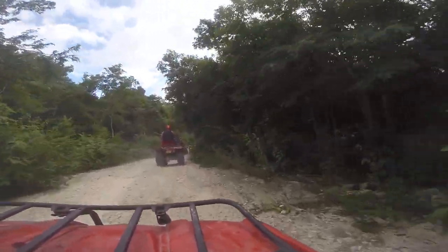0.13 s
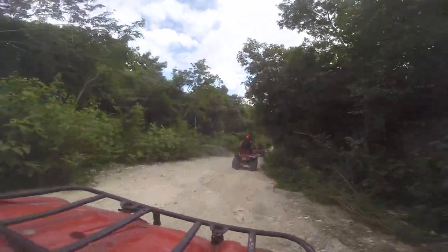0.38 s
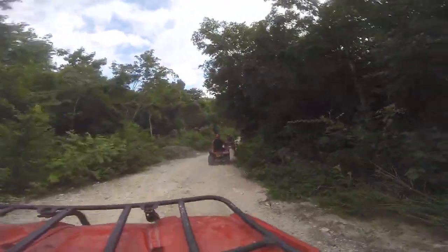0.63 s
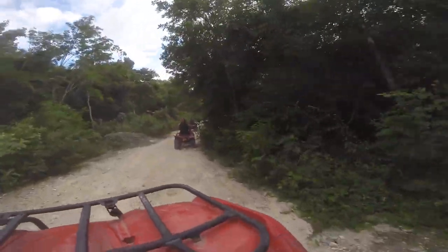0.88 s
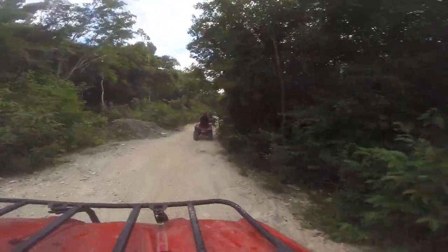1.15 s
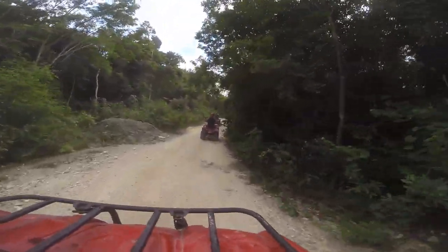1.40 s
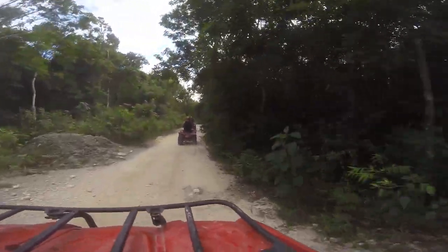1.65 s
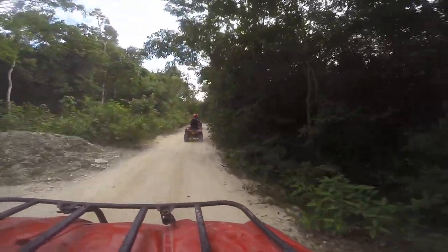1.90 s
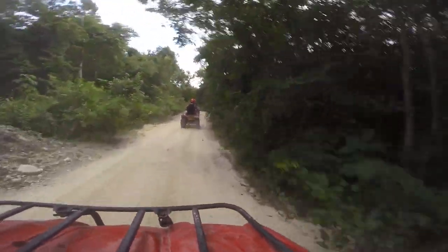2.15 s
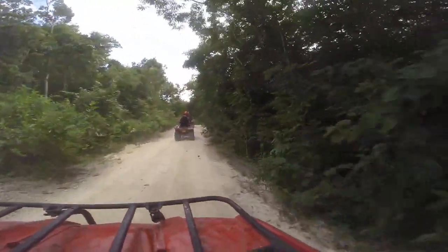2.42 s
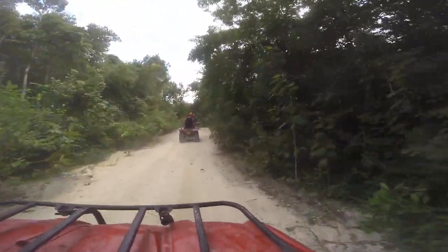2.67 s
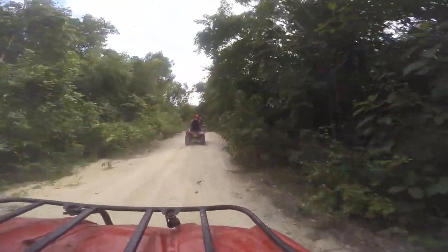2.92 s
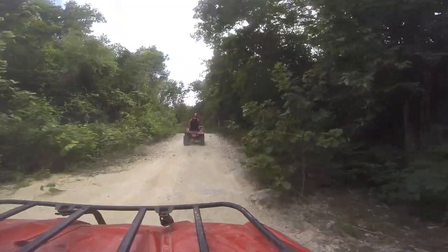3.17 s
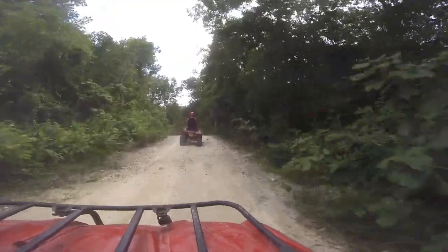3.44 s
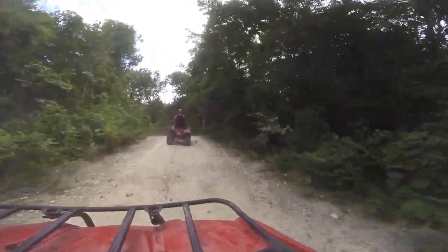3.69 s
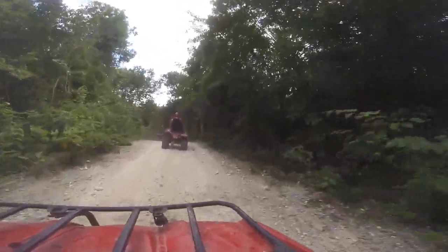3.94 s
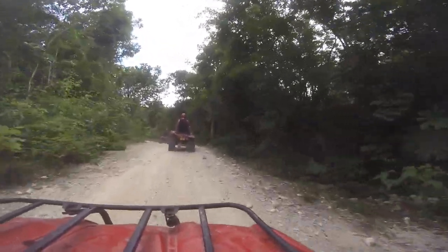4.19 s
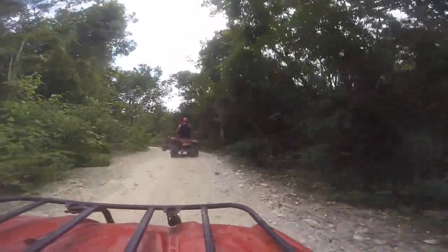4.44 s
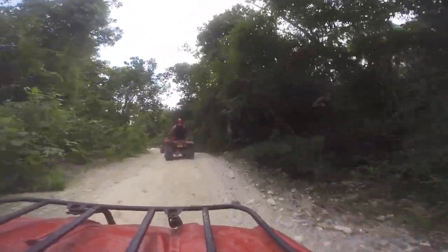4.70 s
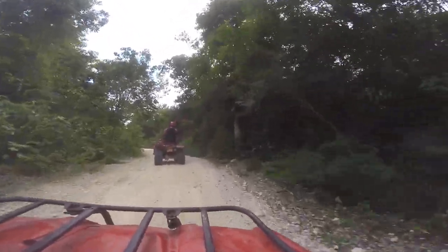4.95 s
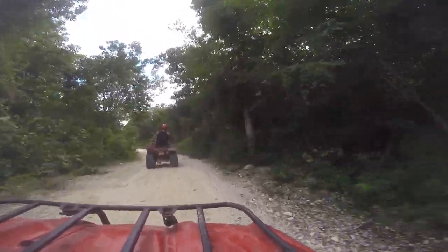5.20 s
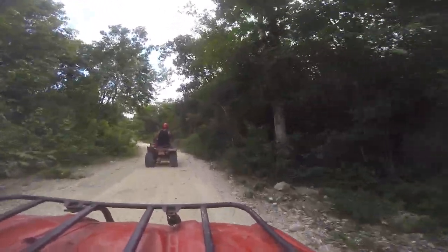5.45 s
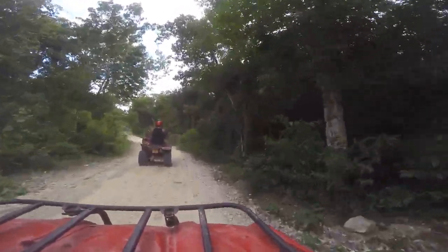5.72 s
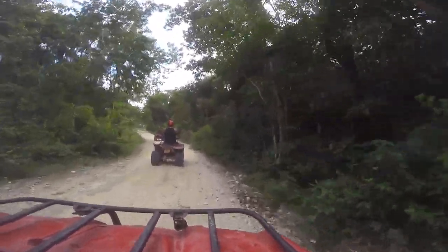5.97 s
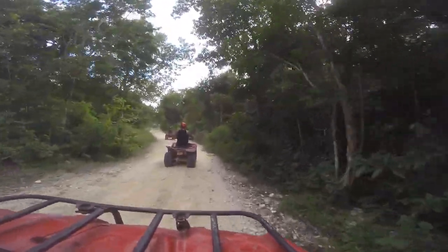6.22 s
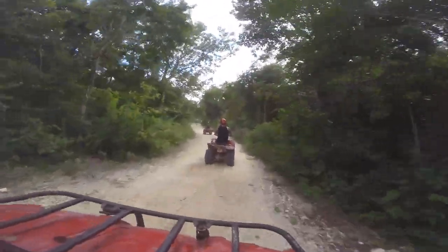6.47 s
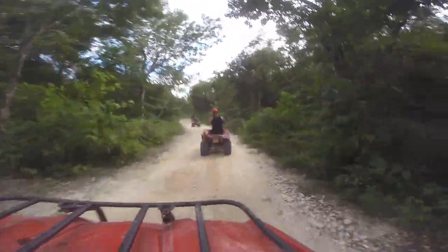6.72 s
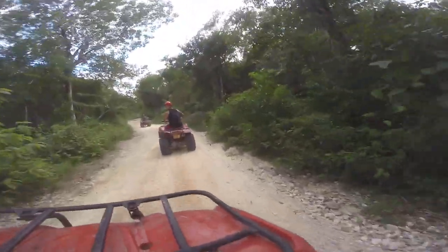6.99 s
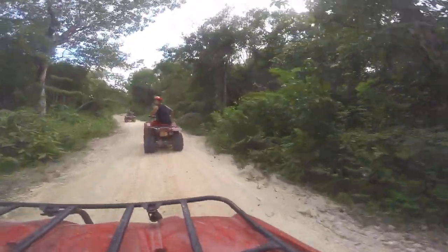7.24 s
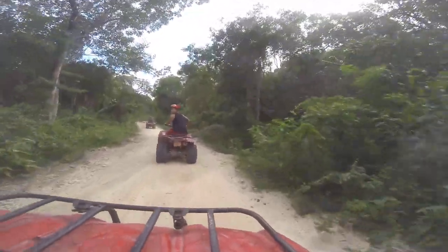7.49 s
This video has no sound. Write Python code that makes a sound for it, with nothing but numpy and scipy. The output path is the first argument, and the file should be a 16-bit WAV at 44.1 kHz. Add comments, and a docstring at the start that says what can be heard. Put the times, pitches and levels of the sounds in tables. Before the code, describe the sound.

From 0 to about 7.6 seconds, a quad bike bounces along a gravel track without stopping. A small sealed camera mounted on it hears everything close, boxy and dulled. A low, lumpy engine rumble, fluttering unevenly at nearly forty beats per second, lies under dense scratchy rattling and dull mount thuds. In the first 3 seconds hard plastic knocks come often, strong near 0.8, 1.3 and 2.2, with deep lurches and faint bright ticks. Short squeaks chirp around 2.3-2.4 and 2.9. The rattling swells near 3, eases around 4, with a slightly brighter rattle and a tiny squeak at 4.2. Thin panels sing faintly, mostly from 2.4 to 4.2. Knocks are sparser from 3 to 6.5, with rumble surging at 5.4. Jolts build again near 6.8; the loudest clacks and thump hit at 7.2, before the ride eases. Big swings briefly duck the level throughout.

```python
"""A low, lumpy rumble runs throughout under a dense rattle: a small sealed camera rides a quad bike on gravel.
Uneven firing and bumps excite the frame's resonances; random blows excite the mount, which thuds dully.
Scratches of loose contacts ring the plastic housing around the microphone, with sharp knocks, bright
ticks and short squeaks. Hard lurches are single low swings, and a gain control ducks after big swings."""
import sys
import numpy as np
from scipy import signal
from scipy.io import wavfile
from scipy.ndimage import uniform_filter1d

SR = 44100
rng = np.random.default_rng(int(sys.argv[2]) if len(sys.argv) > 2 else 0)


def generate_wav(sig):
    """Save sig (samples, or channels by samples) to the path in sys.argv[1] as 16-bit PCM at SR."""
    pcm = np.round(np.clip(np.atleast_2d(sig).T, -1, 1) * 32767).astype(np.int16)
    wavfile.write(sys.argv[1], SR, pcm)


def attenuation_scalar(level_db):
    """Turn a level in dB into a linear amplitude multiplier (20 dB per decade)."""
    decades = np.asarray(level_db, float) / 20
    return 10 ** decades


N = 336042

# Levels are those ahead of the gain control.
# roughness of the ride: start_s, rumble_db, thud_db, rattle_db
RIDE_ROUGHNESS = [(0, -9, -22.5, -22), (.25, -21.5, -24.5, -28.5), (.44, -14.5, -19, -22.5),
                  (.55, -14, -23.5, -27), (.8, -13.5, -17.5, -20), (1.05, -16, -24, -30),
                  (1.2, -26.5, -27, -34.5), (1.3, -12.5, -19.5, -25.5), (1.88, -15.5, -19.5, -20.5),
                  (2.3, -12.5, -21, -24.5), (2.45, -16, -20, -23), (2.72, -19, -22.5, -27.5),
                  (2.95, -12.5, -13.5, -19), (3.7, -16, -18.5, -25), (4, -19, -26, -31),
                  (4.2, -24, -18, -22.5), (4.25, -19, -24.5, -27.5), (4.35, -19.5, -22, -27.5),
                  (4.77, -16.5, -18.5, -24), (4.83, -14.5, -28, -32), (5.05, -17.5, -21.5, -28.5),
                  (5.3, -19.5, -23, -33), (5.44, -10, -18.5, -22.5), (5.7, -17, -22, -30),
                  (6.3, -16.5, -18.5, -27.5), (6.631, -16.5, -24, -28.5), (6.7, -20.5, -22, -24.5),
                  (6.81, -11, -21.5, -21), (6.98, -16, -22.5, -33.5), (7.15, -5.5, -15.5, -19.5),
                  (7.6, -21, -21, -30)]
# resonances of the frame: pitch_hz, width_hz, level_db
FRAME_MODES = [(35.7, 40, -1.5), (66.9, 48.5, -0.5), (106.6, 58.3, -4.5)]
# resonances of the mount: pitch_hz, width_hz, level_db
MOUNT_MODES = [(201.7, 133, -6), (276.4, 83, 2), (317.2, 77.4, -1), (513, 380, -20)]
# peaks and dips of the housing: pitch_hz, width_hz, level_db
HOUSING_MODES = [(1050, 630, 1), (1850, 235, 7), (1990, 990, -7), (2600, 110, 4), (3207, 163, -19),
                 (3870, 276, 10), (4022, 1170, -33.5), (4520, 110, 10.5), (6110, 300, 5), (7200, 560, -2),
                 (8650, 210, 8.5), (12600, 710, -4.5)]
# loose parts: pitch_hz, width_hz, level_db, touch_spread_db, buzz_share (buzz between touches, as a ratio)
LOOSE_PARTS = [(700, 800, -4, 3, 1.07), (1132, 610, 1.5, 4.5, 1.53), (1900, 680, -1, 5, 1.3),
               (2900, 2530, 1, 7, 0.41), (4110, 380, -6, 11.5, 0.26), (5840, 1500, -11.5, 11, 0.34),
               (6980, 1120, 0, 10, 1.1), (10970, 1460, 3.5, 8, 2.5)]
# gain of the rattle's treble: start_s, level_db
RATTLE_TREBLE = [(0, -2), (.8, 0), (3.9, -0.5), (4.18, 4), (4.4, -2.5), (5.201, -2.5), (6.499, -2),
                 (6.751, 1), (7.0, 0), (7.6, -5.5)]
# thin panels that sing: pitch_hz, width_hz, level_db, flutter_db
SINGING_PANELS = [(4550, 120, -31, 7.5), (8430, 130, -52.5, 11)]
# how freely the panels sing, only the changes count: start_s, level_db
PANEL_FREEDOM = [(0, 1), (2.002, -1.5), (2.401, 7.5), (3.801, 10), (4.2, 5.5), (4.349, -6.5), (7.602, -8)]
# hard knocks of the housing: start_s, peak_db, thud_db, pitch_hz
HARD_KNOCKS = [(0.046, -12.5, -20, 1410), (0.123, -5, -30, 1950), (0.292, -11, -29, 1270),
               (0.397, -8.5, -21, 1660), (0.617, -8, -7, 1030), (0.754, -1.5, -30, 1860),
               (0.781, -3.5, -16, 2200), (0.847, -6, -42, 1680), (0.909, -4.5, -10, 1850),
               (1.056, -8.5, -6.5, 2600), (1.115, -10, -11, 926), (1.149, -17.5, -20, 1520),
               (1.311, -12, -6.5, 1650), (1.316, 0, -20, 1850), (1.522, -8.5, -11, 1110),
               (1.632, -14.5, -26, 956), (1.859, -3, -15, 1480), (1.967, -10.5, -3.5, 1840),
               (2.027, -2.5, -25.5, 1880), (2.204, -2.5, -4.5, 1300), (2.365, -17, -26, 1760),
               (2.438, -4.5, -16, 2050), (2.808, -11, -9, 1800), (2.835, -14, -16, 1070),
               (2.886, -7.5, -15, 2600), (2.954, -14, -3, 1350), (3.44, -16, -1, 1740),
               (3.651, -8.5, -30, 1690), (3.894, -14.5, -8.5, 1880), (4.505, -7.5, -7.5, 1500),
               (4.607, -11, -29, 1750), (4.769, -5.5, -19, 1850), (5.022, -12, -9, 1130),
               (5.422, -8.5, -34, 1900), (5.593, -17, -4.5, 1650), (5.671, -12, -27, 1850),
               (5.846, -11.5, -9, 1730), (6.273, -9, -9, 1930), (6.397, -20, -24, 1310),
               (6.732, -10, -17, 1600), (6.895, -7, -37, 1850), (7.117, -8.5, -26, 1050),
               (7.173, 5, -25, 1790), (7.249, -4.5, 3, 1700), (7.254, 3, -17, 1000)]
# hard lurches of the frame: centre_s, direction (up 1, down -1)
FRAME_LURCHES = [(0.127, -1), (0.479, -1), (0.873, -1), (1.08, -1), (1.329, -1), (1.536, 1), (1.547, -1),
                 (1.617, -1), (1.929, 1), (2.068, 1), (2.104, -1), (2.226, 1), (2.262, 1), (2.459, -1),
                 (2.678, 1), (2.963, 1), (3.084, -1), (3.209, -1), (3.328, -1), (3.55, 1), (3.79, -1),
                 (3.932, 1), (4.09, 1), (4.227, 1), (4.241, -1), (4.436, 1), (4.644, -1), (4.813, -1),
                 (5.158, 1), (5.218, -1), (5.44, -1), (5.513, -1), (5.712, 1), (5.943, -1), (6.125, -1),
                 (6.332, 1), (6.773, 1), (6.823, 1), (6.833, -1), (7.007, 1), (7.13, 1), (7.356, -1)]
# bright ticks: centre_s, swell_db (envelope peak before the band filters)
BRIGHT_TICKS = [(0.871, -29.5), (0.911, -35), (1.06, -51), (1.3178, -46), (1.8805, -34), (2.264, -40.5),
                (6.005, -48.5), (6.8087, -41), (7.255, -37)]
# squeaks of a loose part: centre_s, peak_db, pitch_hz
PART_SQUEAKS = [(2.259, -14, 2280), (2.368, -15, 1800), (2.4, -10, 2500), (2.906, -15, 2400),
                (4.192, -17, 1800)]

FIRING_HZ = 38.6  # mean rate
CONTACTS_PER_S, JOLTS_PER_S, RINGS_PER_S = 240, 50, 70  # each before the swing scales it
CONTACT_S = 0.00098  # decay time of one touch
RING_CYCLES = 10.3  # pitch over bandwidth of each ring's resonances
KNOCK_RISE_S, KNOCK_S = 0.0002, 0.0028
LURCH_DB, LURCH_S, COUNTER_SWING = -2, 0.0025, 0.62
SQUEAK_S = 0.0035
DUCK_ABOVE_DB, DUCK_ATTACK_S = -10.5, 0.02
DUCK_SHARE, RECOVER_DB_PER_S = 0.9, 100  # the share scales both the fall and the recovery


def rms_one(x):
    """Normalization: divides by the root mean square."""
    return x / np.sqrt(np.mean(x ** 2) + 1e-20)


def drift(rate_hz):
    """Low-passed noise: two equal poles leave a slow random course of spread 1."""
    r = np.exp(-2 * np.pi * rate_hz / SR)
    noise = rng.standard_normal(N + SR)
    return rms_one(signal.lfilter([1], [1, -2 * r, r * r], noise)[SR:])


def course(table):
    """Linear interpolation in decibels turns a table into a gain over time."""
    return attenuation_scalar(np.interp(np.arange(N) / SR, *np.transpose(table)))


def cut(x, hz, kind, order=2):
    """Butterworth filtering: a maximally flat passband."""
    return signal.sosfilt(signal.butter(order, hz, kind, fs=SR, output="sos"), x)


def resonance(x, hz, width_hz):
    """Damped resonance: a pole pair passes one band, with gain 1 on top."""
    r = np.exp(-np.pi * width_hz / SR)
    poles = [1, -2 * r * np.cos(2 * np.pi * hz / SR), r * r]
    return signal.lfilter(np.array([1, 0, -1]) * (1 - r * r) / 2, poles, x)


def body(x, modes):
    """Modal superposition: resonances side by side, with alternating signs."""
    return sum((-1) ** k * attenuation_scalar(db) * resonance(x, hz, width_hz)
               for k, (hz, width_hz, db) in enumerate(modes))


def evened(x, seconds):
    """Envelope division: slow swells are divided out, so that the ride alone sets them."""
    power = uniform_filter1d(x ** 2, int(seconds * SR))
    return rms_one(x / np.sqrt(power + 1e-12))


def swelling(clicks, seconds):
    """Gaussian convolution: each click becomes an envelope of its height that swells and fades alike."""
    t = np.arange(-SR // 40, SR // 40 + 1) / SR / seconds
    return np.maximum(signal.fftconvolve(clicks, np.exp(-t ** 2 / 2), "same"), 0)


def engine_turns():
    """Phase as the integral of frequency: firing cycles passed so far; the speed hunts over the bumps."""
    return np.cumsum(FIRING_HZ * (1 + 0.06 * drift(3.0))) / SR


def rumble(turns):
    """Forced vibration: uneven firing kicks and random bumps of the track excite the frame's modes."""
    kicks = np.diff(np.floor(turns), prepend=0) * attenuation_scalar(5.4 * rng.standard_normal(N))
    hits = rng.random(N) < 320 / SR
    bumps = rng.standard_normal(N) * hits * attenuation_scalar(2.2 * drift(7.6))
    frame = body(1.1 * rms_one(kicks) + rms_one(bumps), FRAME_MODES)
    return evened(cut(cut(frame, 13, "high"), 170, "low"), 0.23)


def mounting(x):
    """Modal response and isolation: the mount thuds in low modes; its soft pad keeps the treble out."""
    return cut(body(x, MOUNT_MODES), 880, "low")


def thuds(shake):
    """Random impact excitation: the mount is struck by chance, harder while the frame swings far."""
    struck = rng.random(N) < 260 / SR
    sizes = attenuation_scalar(2.73 * np.minimum(rng.exponential(1, N), 5)) * rng.choice([-1, 1], N)
    force = (0.5 + np.abs(shake)) ** 0.41
    return evened(mounting(struck * sizes * force), 0.36)


def housing(x):
    """Shell transmission: the sealed shell passes a band with peaks and dips and falls steeply above it."""
    x = cut(cut(x, 760, "high", order=1), 2600, "low", order=4)
    for hz, width_hz, db in HOUSING_MODES:
        x = x + (attenuation_scalar(db) - 1) * resonance(x, hz, width_hz)
    return x


def small_rings(swing):
    """Free vibration: now and then a bracket or bolt, struck by chance, rings for a few cycles at its pitch."""
    struck = (rng.random(N) < RINGS_PER_S * swing / SR) * rng.standard_normal(N)
    pitches = np.geomspace(950, 3900, 14)
    dealt = rng.integers(0, len(pitches), N)
    rings = 0
    for k, hz in enumerate(pitches):
        blows = struck * (dealt == k) + 1e-18  # the offset keeps the filter's numbers from vanishing
        width_hz = hz / RING_CYCLES
        rings = rings + resonance(resonance(blows, hz, width_hz), hz, width_hz)
    return rms_one(rings)


def loose_contacts(swing):
    """Intermittent contact: each touch is a sudden scratch that dies at once, over a buzz that follows the swing."""
    together = rng.random(N) < JOLTS_PER_S * swing / SR  # jolts that move every part at once
    out = 0
    for hz, width_hz, db, spread_db, buzz_share in LOOSE_PARTS:
        touch = together | (rng.random(N) < CONTACTS_PER_S * swing / SR)
        sizes = attenuation_scalar(spread_db * np.minimum(rng.exponential(1, N), 3.2))
        decay = signal.lfilter([1], [1, -np.exp(-1 / (CONTACT_S * SR))], touch * sizes)
        looseness = attenuation_scalar(1.93 * drift(30.0))  # each part loosens and binds
        scratch = rng.standard_normal(N) * (decay + buzz_share * swing) * looseness
        out = out + attenuation_scalar(db) * resonance(scratch, hz, width_hz)
    return rms_one(out)


def panels(contacts):
    """Sympathetic resonance: the rattle drives thin panels, which sing in short flutters while it is strong."""
    singing = course(PANEL_FREEDOM)
    out = 0
    for hz, width_hz, db, flutter_db in SINGING_PANELS:
        flutter = contacts * singing * attenuation_scalar(flutter_db * drift(30.0))
        out = out + attenuation_scalar(db) * rms_one(resonance(resonance(flutter, hz, width_hz), hz, width_hz))
    return out


def rattle(turns, shake):
    """Amplitude modulation: loose parts touch most at both ends of each swing and ring the housing."""
    swing = attenuation_scalar(1.4 * np.cos(4 * np.pi * turns) + 2.7 * drift(14.0)) * (0.5 + np.abs(shake)) ** 0.71
    contacts = loose_contacts(swing) + attenuation_scalar(-15) * small_rings(swing)
    treble = (course(RATTLE_TREBLE) - 1) * cut(contacts, 2100, "high")
    shell = evened(housing(contacts + treble), 0.16)
    return shell + panels(contacts)


def knocks():
    """Impact response: a short scratch around its own pitch rings the housing, with a thump of the mount."""
    shell, mount = np.zeros((2, N + SR))
    t = np.arange(SR // 20) / SR
    envelope = (1 - np.exp(-t / KNOCK_RISE_S)) * np.exp(-t / KNOCK_S)
    for s, peak_db, thud_db, hz in HARD_KNOCKS:
        at = round(s * SR)
        scratch = rng.standard_normal(len(t)) * envelope
        rung = housing(resonance(scratch, hz, 300) + scratch)
        shell[at:at + len(t)] += attenuation_scalar(peak_db) * rung / np.max(np.abs(rung))
        mount[at] = attenuation_scalar(thud_db)
    thump_peak = np.max(np.abs(mounting(signal.unit_impulse(len(t)))))
    return shell[:N] + mounting(mount[:N]) / thump_peak


def lurches():
    """Transient displacement: one swing of the frame, with a smaller counter-swing before and after."""
    s, direction = np.transpose(FRAME_LURCHES)
    clicks = np.zeros(N)
    clicks[np.round(s * SR).astype(int)] = attenuation_scalar(LURCH_DB) * np.sign(direction)
    t = np.arange(-SR // 50, SR // 50 + 1) / SR / LURCH_S
    swing = (1 - COUNTER_SWING * t ** 2) * np.exp(-t ** 2 / 2)
    return signal.fftconvolve(clicks, swing, "same")


def ticks():
    """Direct transmission: a few contacts right at the microphone port skip the shell's dulling."""
    s, swell_db = np.transpose(BRIGHT_TICKS)
    clicks = np.zeros(N)
    clicks[np.round(s * SR).astype(int)] = attenuation_scalar(swell_db)
    bright = rms_one(rng.standard_normal(N)) * swelling(clicks, 0.0013)
    return cut(cut(bright, 6500, "high", order=4), 13300, "low", order=6)


def squeaks():
    """Frequency modulation: a brief wavering tone of a loose part under a smooth swell."""
    out, waver = np.zeros(N), drift(59.0)
    t = np.arange(-SR // 40, SR // 40)  # samples from the centre
    for s, peak_db, hz in PART_SQUEAKS:
        at = round(s * SR) + t
        bend = waver[at] - waver[at[len(t) // 2]]  # the pitch is exact at the centre
        turns = np.cumsum(hz * (1 + 0.04 * bend)) / SR
        swell = np.exp(-(t / SR / SQUEAK_S) ** 2 / 2)
        out[at] += attenuation_scalar(peak_db) * swell * np.sin(2 * np.pi * turns)
    return out


def scene():
    """Superposition: the layers add, and a lurch overrides the rumble while it lasts."""
    s, *levels = np.transpose(RIDE_ROUGHNESS)
    rumble_gain, thud_gain, rattle_gain = [course(np.column_stack([s, db])) for db in levels]
    turns = engine_turns()
    shake, heave = rumble(turns), lurches()
    out = rumble_gain * shake * (1 - np.minimum(2 * np.abs(heave), 1))
    out = out + thud_gain * thuds(shake)
    out = out + rattle_gain * rattle(turns, shake + 2 * heave)
    return (out + heave + knocks() + squeaks() + ticks())[None]


def ducked(x):
    """Gain control: loud swings below 240 Hz pull the level down quickly; it climbs back at a steady rate."""
    climb_db = RECOVER_DB_PER_S * np.arange(N) / SR
    level_db = 20 * np.log10(np.abs(cut(x, 240, "low")) + 1e-9)
    over_db = np.maximum(level_db - DUCK_ABOVE_DB, 0)
    held_db = np.maximum.accumulate(over_db + climb_db, axis=-1) - climb_db
    r = np.exp(-1 / (DUCK_ATTACK_S * SR))
    return x * attenuation_scalar(-DUCK_SHARE * signal.lfilter([1 - r], [1, -r], held_db))


def top_cut(x):
    """Nothing passes above the cut-off."""
    return signal.sosfilt(signal.butter(12, 15200, fs=SR, output="sos"), x)


def record(dry):
    """Soft saturation: after the gain control, the loudest peaks are rounded off."""
    top = 1.6  # ceiling of the rounded peaks
    mix = top * np.tanh(ducked(dry) / top)
    return top_cut(mix)


dry = scene()
out = record(dry)
generate_wav(out)
```